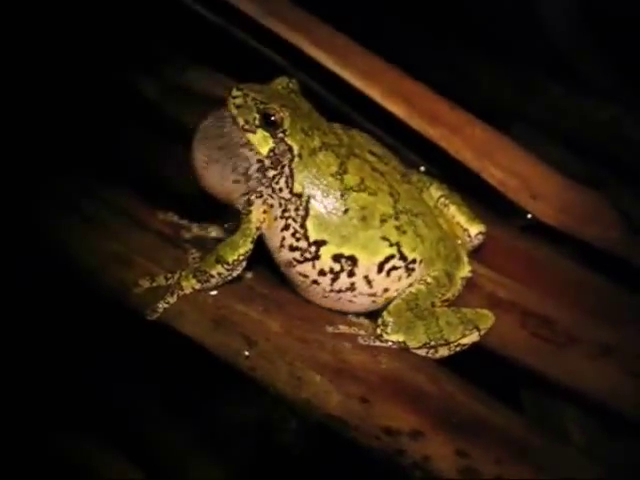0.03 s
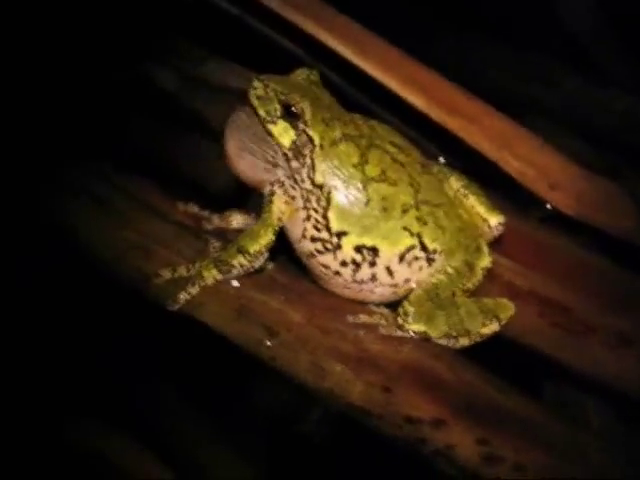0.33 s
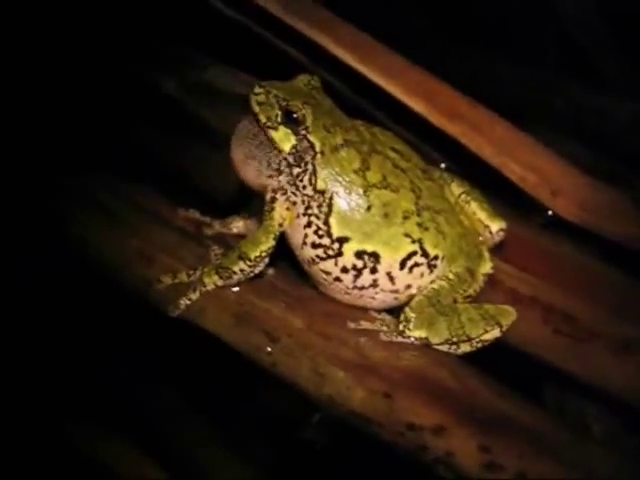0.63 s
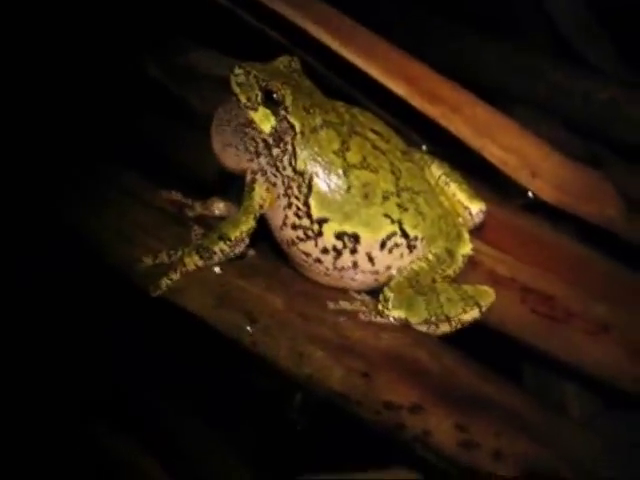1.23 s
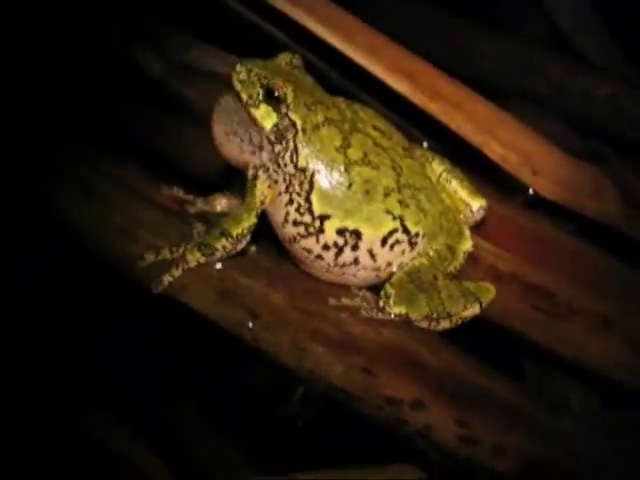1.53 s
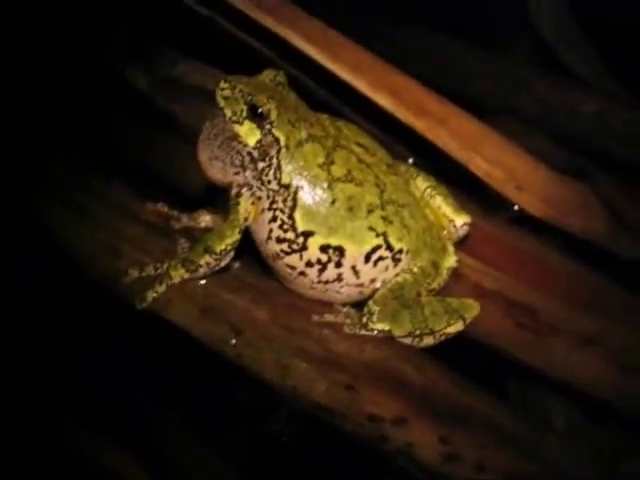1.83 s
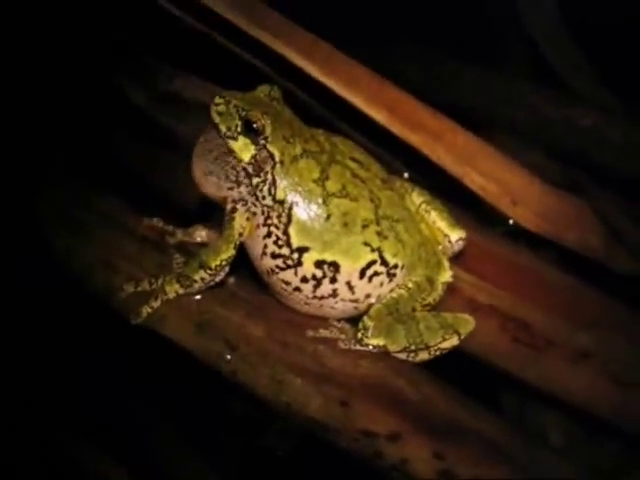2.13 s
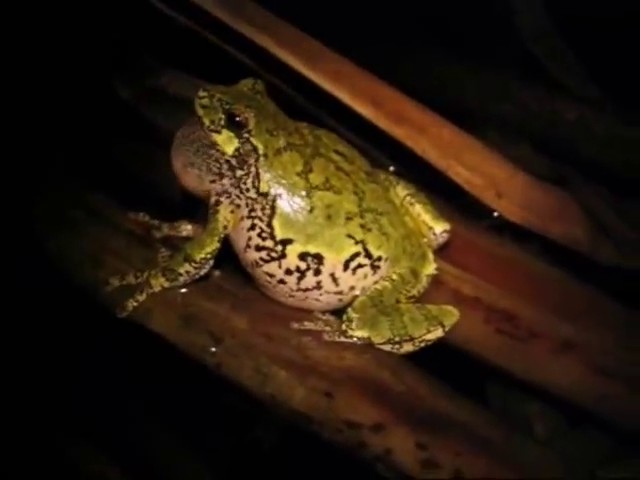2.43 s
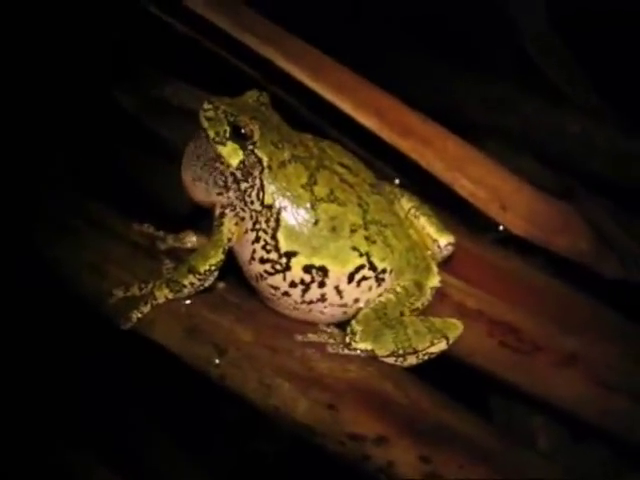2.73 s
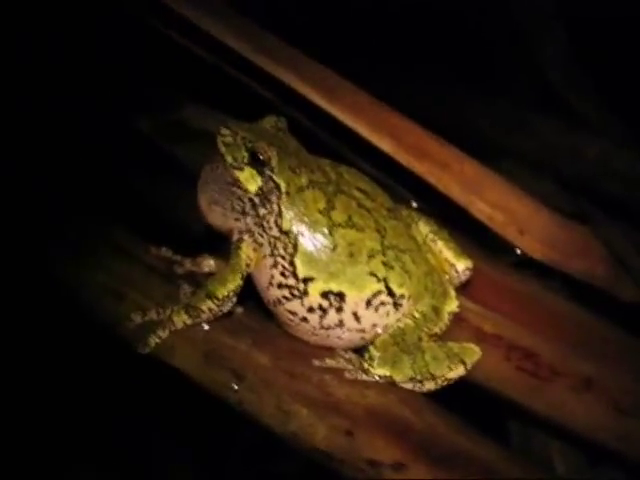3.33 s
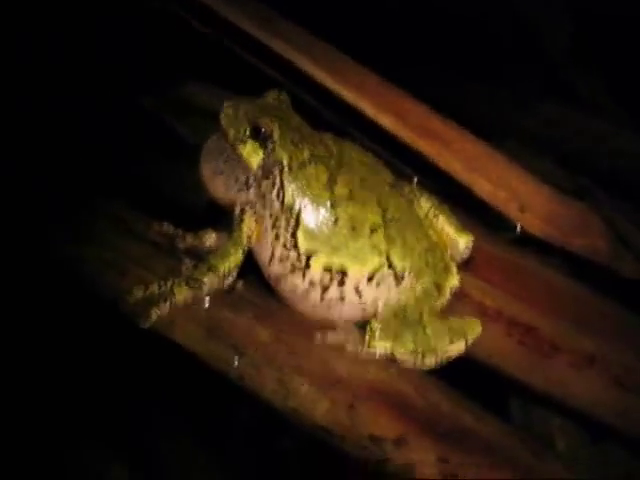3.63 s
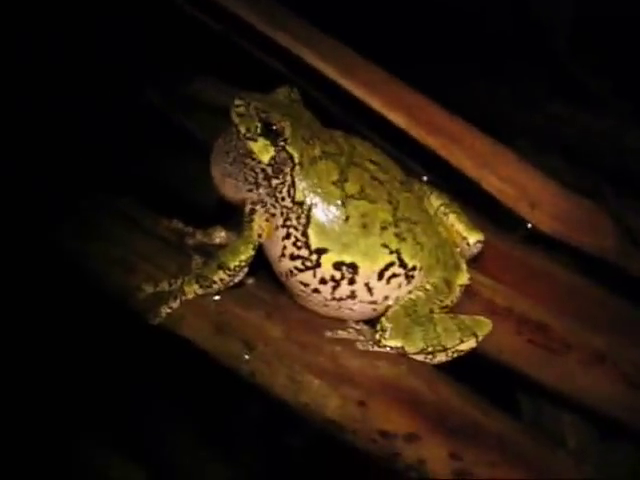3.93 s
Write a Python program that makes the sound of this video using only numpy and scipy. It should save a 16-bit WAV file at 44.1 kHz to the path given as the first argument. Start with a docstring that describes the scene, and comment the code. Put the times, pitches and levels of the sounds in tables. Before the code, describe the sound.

Fast pulsing frog trills overlap outdoors at night, one frog close, the others farther off.

```python
"""A treefrog is already trilling in the night; neighbours answer and overlap, and halfway through
the main frog starts up on a plank close to the microphone. Every pulse of a trill is a short upward
chirp whose second harmonic swells as it passes the vocal sac's resonance. Planks and plants echo;
a distant chorus, a low rumble, hum and hiss lie beneath. The recorder holds each sample of a low
rate, which mirrors the calls into a thin metallic treble."""
import sys
import numpy as np
from scipy import signal
from scipy.fft import rfft, irfft, next_fast_len
from scipy.io import wavfile
from scipy.ndimage import map_coordinates

SR = 44100
rng = np.random.default_rng(int(sys.argv[2]) if len(sys.argv) > 2 else 0)


def store_pcm(level_fs):
    """Save levels as 16-bit WAV."""
    pcm = np.round(np.clip(level_fs, -1, 1) * 32767).astype(np.int16)
    wavfile.write(sys.argv[1], SR, np.atleast_2d(pcm).T)


N = 176400

# The main frog's pulses: mid_pulse_s, relative_level_db
NEAR_PULSES = [(2.114, -24), (2.166, -17), (2.217, -14), (2.268, -11.5), (2.322, -12), (2.373, -11.5),
               (2.428, -11.5), (2.483, -11.5), (2.541, -11), (2.597, -11), (2.655, -11), (2.712, -11.5),
               (2.77, -12), (2.828, -11.5), (2.885, -11.5), (2.943, -11.5), (3.001, -11.5), (3.059, -11.5),
               (3.118, -11.5), (3.176, -11), (3.235, -11.5), (3.294, -12)]
# Slaps off the planks around it: delay_ms, level_db
PLANK_ECHOES = [(6.54, -9), (8.77, -15), (15.64, -10), (20.27, -13), (24.51, -13), (28.22, -10.5)]


def near_frog():
    """Long, slow chirps up front, thrown back by the planks, which reflect the fundamental less."""
    call = trill(NEAR_PULSES, pitch_hz=2047.6, glide=0.1, bend=0.14, hook=0.085, length_ms=30.8,
                 swell_ms=10.7, peak_ms=0.78, low_db=-12, low_rise_db=-0.5, third_db=-27.5)
    slaps = equalised(reflections(call, PLANK_ECHOES), [(1100, -20), (1800, 0)])
    return placed(call, gain_db=0.5, reverb_db=-9) + slaps


# Tone colour of throat and vocal sac: frequency_hz, gain_db
THROAT_EQ = [(800, -3.5), (1000, -1.5), (1250, 2), (1500, 3), (1800, -1), (2300, 0), (2450, -4),
             (2620, -8.5), (2850, 2.5), (3300, -2), (3700, -6)]
WARM_UP_SHORTER, WARM_UP_PULSES = 0.68, 2.3  # short opening pulses: share lost, pulses to recover
WARM_UP_LOW_DB = 15.5  # extra fundamental per share of length lost
JITTER, RASP = 0.0036, 0.047  # pitch scatter between pulses, level flutter within one
CEILING, SHUT_STEEPNESS = 1.288, 44  # the larynx shuts at this multiple of pitch_hz, and how abruptly


def trill(pulses, pitch_hz, glide, bend, length_ms, swell_ms, low_db, third_db,
          hook=0, peak_ms=1, low_rise_db=0, warm=0):
    """Upward chirps from the larynx; the sac swells their second harmonic (pitch_hz at mid-pulse).
    glide is the pitch share gained in half a pulse; bend steepens both ends, hook the last one.
    The fundamental (low_db) lasts the whole pulse; warm=1 is a trill already under way."""
    out = np.zeros(N + SR)
    size = SR // 14
    ms = (np.arange(size) - size // 2) * 1000 / SR  # time from mid-pulse
    for k, (mid_pulse_s, level_db) in enumerate(pulses):
        stretch = 1 - (1 - warm) * WARM_UP_SHORTER * np.exp(-k / WARM_UP_PULSES)
        position = np.clip(2 * ms / (length_ms * stretch), -2, 2)  # -1 to 1 spans the pulse
        sweep = 1 + glide * position + hook * position ** 2 + bend * position ** 3
        hz = pitch_hz * (1 + JITTER * rng.normal()) * sweep
        larynx_open = 1 / (1 + (hz / (pitch_hz * CEILING)) ** SHUT_STEEPNESS)
        phase = np.pi * np.cumsum(hz) / SR + 2 * np.pi * rng.random()  # fundamental, at hz / 2
        envelope = larynx_open * np.exp(-position ** 4) * (1 + RASP * wobble(888, size))
        swell = 1 / (1 + ((ms / stretch - peak_ms) / swell_ms) ** 2)
        low_gain = amp(low_db + low_rise_db * position + WARM_UP_LOW_DB * (1 - stretch))
        fundamental = swell ** 0.18 * low_gain * np.sin(phase)
        second = swell * np.sin(2 * phase)
        third = np.sqrt(swell) * amp(third_db) * np.sin(3 * phase)
        voice = fundamental + second + third
        out[round(mid_pulse_s * SR):][:size] += amp(level_db) * envelope * voice
    return equalised(out[size // 2:][:N], THROAT_EQ)  # centre each pulse on mid_pulse_s


# Each neighbour's pulses, in order of entry: mid_pulse_s, relative_level_db
OPENING_PULSES = [(0.01, -20.5), (0.065, -20.5), (0.115, -19.5), (0.166, -19), (0.218, -18.5), (0.273, -19),
                  (0.326, -19.0), (0.382, -18), (0.444, -18.5)]
FAR_PULSES = [(0.513, -32.5), (0.562, -33.5), (0.613, -34), (0.667, -32), (0.717, -33.5), (0.767, -31.8),
              (0.818, -31.5), (0.866, -33), (0.92, -32.5), (0.972, -31.5)]
HIGH_PULSES = [(0.875, -28.5), (0.929, -26), (0.985, -23.5), (1.039, -21), (1.091, -19), (1.143, -18.5),
               (1.199, -20.0), (1.254, -18), (1.306, -18), (1.364, -18.1), (1.421, -16.5), (1.479, -18.5),
               (1.535, -18), (1.591, -16.5), (1.649, -18.5), (1.71, -16.5), (1.766, -15), (1.825, -14.5),
               (1.892, -16.5)]
LOW_PULSES = [(1.187, -26.5), (1.234, -25), (1.281, -21), (1.329, -20), (1.378, -20), (1.429, -21),
              (1.476, -22.5), (1.524, -19), (1.572, -19), (1.621, -18), (1.671, -17), (1.723, -18),
              (1.773, -17), (1.826, -19), (1.878, -16), (1.935, -17.5)]
QUICK_PULSES = [(3.26, -14.5), (3.307, -15), (3.357, -14), (3.405, -10.5), (3.454, -11), (3.505, -10),
                (3.554, -11), (3.605, -12), (3.655, -11), (3.707, -10.5), (3.758, -11.5), (3.81, -12),
                (3.862, -17), (3.914, -14.5), (3.968, -14.0)]
LATE_PULSES = [(3.603, -25.5), (3.651, -23.5), (3.703, -23), (3.757, -18), (3.81, -14.5), (3.859, -12),
               (3.911, -12), (3.964, -12)]
CLOSING_PULSES = [(3.841, -31), (3.891, -19), (3.94, -19), (3.988, -17)]
# Slaps off hard surfaces beside the two closest neighbours: delay_ms, level_db
OPENING_ECHOES = [(9.07, -12)]
QUICK_ECHOES = [(20.94, -22), (27.0, -17.5)]


def neighbours():
    """Seven trills in the middle distance, each with its own voice, all wetter than the main frog."""
    opening = trill(OPENING_PULSES, pitch_hz=1995, glide=0.22, bend=-0.03, hook=0.00955, length_ms=24,
                    swell_ms=5.2, peak_ms=0.36, low_db=-14, third_db=-26.5, warm=1)
    far = trill(FAR_PULSES, pitch_hz=1856, glide=0.21, bend=0.0098, length_ms=39,
                swell_ms=4.7, peak_ms=0.4, low_db=-8, third_db=-38, warm=0.94)
    high = trill(HIGH_PULSES, pitch_hz=2102, glide=0.22, bend=0.05, hook=0.044, length_ms=29,
                 swell_ms=5.86, peak_ms=0.23, low_db=-15.5, low_rise_db=1, third_db=-25.5)
    low = trill(LOW_PULSES, pitch_hz=1906, glide=0.2, bend=0.04, hook=0.03985, length_ms=30,
                swell_ms=4.65, peak_ms=0.37, low_db=-12, low_rise_db=5, third_db=-35)
    quick = trill(QUICK_PULSES, pitch_hz=2171, glide=0.23, bend=0.092, hook=0.06, length_ms=23,
                  swell_ms=4.35, peak_ms=0.32, low_db=-21, low_rise_db=-8, third_db=-27)
    late = trill(LATE_PULSES, pitch_hz=1953, glide=0.18, bend=0.061, hook=0.03016, length_ms=31.9,
                 swell_ms=6, peak_ms=0.31, low_db=-9.5, low_rise_db=0.5, third_db=-23)
    closing = trill(CLOSING_PULSES, pitch_hz=1947, glide=0.193, bend=0.055, length_ms=27.5,
                    swell_ms=3.3, peak_ms=0.4, low_db=-22, third_db=-30)
    return (placed(opening, gain_db=1, reverb_db=-7.5, echoes=OPENING_ECHOES)
            + placed(far, gain_db=1, reverb_db=-6)
            + placed(high, gain_db=0, reverb_db=-4.5)
            + placed(low, gain_db=1.5, reverb_db=-5)
            + placed(quick, gain_db=-1, reverb_db=-4.5, echoes=QUICK_ECHOES)
            + placed(late, gain_db=-1, reverb_db=-7.5)
            + placed(closing, gain_db=2.5, reverb_db=-1))


def placed(call, gain_db, reverb_db, echoes=()):
    """Set a frog at its distance: direct call, any slaps and a reverb send."""
    return amp(gain_db) * (call + reflections(call, echoes) + amp(reverb_db) * woodland_reverb(call))


def reflections(call, echoes):
    """Delayed copies off hard surfaces."""
    return filtered(call, lambda hz: sum(amp(db) * np.exp(-2j * np.pi * hz * ms / 1000)
                                         for ms, db in echoes))


def woodland_reverb(call, plants_t60_s=0.17, woods_t60_s=0.37, woods_db=-5):
    """Quick scatter from plants and a longer tail from the woods, as loud as the call."""
    t = np.arange(SR // 2) / SR
    fade_in = np.clip(t / 0.005, 0, 1) ** 2
    decay = amp(-60 * t / plants_t60_s) + amp(woods_db - 60 * t / woods_t60_s)
    tail = fade_in * decay * rng.standard_normal(len(t))
    return unit(signal.fftconvolve(call, tail)[:N]) * np.std(call)


# Fader ride of the distant chorus: time_s, level_db
CHORUS_FADER = [(0, -46), (.8, -49.5), (2, -35), (4, -35)]


def chorus(frogs=3, pitch_hz=2001, pulses_per_s=18.5):
    """Distant frogs heard only as reverb, each a little off in pace and pitch."""
    wash = np.zeros(N)
    for lag, spacing, detune in rng.uniform(-1, 1, (frogs, 3)):
        times = np.arange((lag + 1) / 2, N / SR * pulses_per_s, 1 + 0.08 * spacing) / pulses_per_s
        call = trill([(s, 0) for s in times], pitch_hz * (1 + 0.03 * detune), glide=0.18, bend=0.02943,
                     length_ms=30, swell_ms=5.3, low_db=-8.5, low_rise_db=-1, third_db=-21, warm=1)
        wash += woodland_reverb(call)
    return amp(curve(CHORUS_FADER)) * unit(wash)


# Faint hum tones: pitch_hz, level_db
HUM_TONES = [(118, -56), (314, -63), (625, -68)]
# Colour of the rumble and the hiss: frequency_hz, gain_db
RUMBLE_EQ = [(15, -7), (30, -9), (45, 5.5), (70, -1.5), (110, -7), (200, -11), (350, -15.5), (700, -25),
             (1500, -29)]
HISS_EQ = [(100, 6), (600, -2.5), (1500, 0), (3000, -1), (5500, -3)]
# Their fader rides: time_s, relative_level_db
RUMBLE_FADER = [(0.1, -52), (1.93, -43.5), (2.24, -43), (2.25, -44.5), (3.07, -49), (3.75, -41.5),
                (3.87, -47), (3.9, -48)]
HISS_FADER = [(0.1, -55.5), (3.24, -53), (3.31, -55), (3.88, -53), (3.9, -52.5)]


def night_bed(hiss_boost_db=8.5):
    """Low rumble of the night air, a faint wavering hum and microphone hiss."""
    t = np.arange(N) / SR
    hum = sum(amp(db) * np.sqrt(2) * np.sin(2 * np.pi * hz * t + 1.1 * wobble(6, N))
              for hz, db in HUM_TONES)
    hiss = unit(filtered(noise(HISS_EQ), lambda hz: hz < SR / HOLD_SAMPLES / 2))
    rumble = amp(curve(RUMBLE_FADER)) * noise(RUMBLE_EQ)
    return rumble + hum + amp(curve(HISS_FADER) + hiss_boost_db) * hiss


def amp(db):
    """Decibels to gain."""
    return 10 ** (np.asarray(db) / 20)


def unit(x):
    """Scale to rms 1."""
    return x / np.sqrt(np.mean(x ** 2) + 1e-20)


def curve(points):
    """Join (time_s, value) points, one value per sample."""
    return np.interp(np.arange(N) / SR, *np.transpose(points))


def wobble(rate_hz, size):
    """A smooth random curve through rate_hz knots a second."""
    knots = rng.standard_normal(int(size * rate_hz / SR) + 4)
    return map_coordinates(knots, [np.arange(size) * rate_hz / SR])


def filtered(x, response):
    """Multiply the spectrum by response(hz)."""
    size = next_fast_len(N + SR // 2)
    return irfft(rfft(x, size) * response(np.fft.rfftfreq(size, 1 / SR)), size)[:N]


def equalised(x, eq):
    """Apply (frequency_hz, gain_db) points, joined on a log frequency axis."""
    points_hz, gains_db = np.transpose(eq)
    return filtered(x, lambda hz: amp(np.interp(np.log(hz + 1), np.log(points_hz + 1), gains_db)))


def noise(eq):
    """Coloured noise of rms 1."""
    return unit(equalised(rng.standard_normal(N), eq))


def scene():
    """All the frogs over the night bed, in mono."""
    return (near_frog() + neighbours() + chorus() + night_bed())[None]


HOLD_SAMPLES, TOP_HZ, DC_BIAS = 4, 14500, 0.046  # the recorder's hold, treble limit and steady offset


def record(dry):
    """Sample-and-hold at a quarter rate mirrors the sound around that rate; the mirrored bass is lost."""
    held = np.repeat(dry[0, ::HOLD_SAMPLES], HOLD_SAMPLES)[:N]
    trimmed = filtered(held, lambda hz: (hz < TOP_HZ) * (abs(hz - SR / HOLD_SAMPLES) > 700))
    return DC_BIAS + trimmed[None]


dry = scene()
out = record(dry)
store_pcm(out)
```